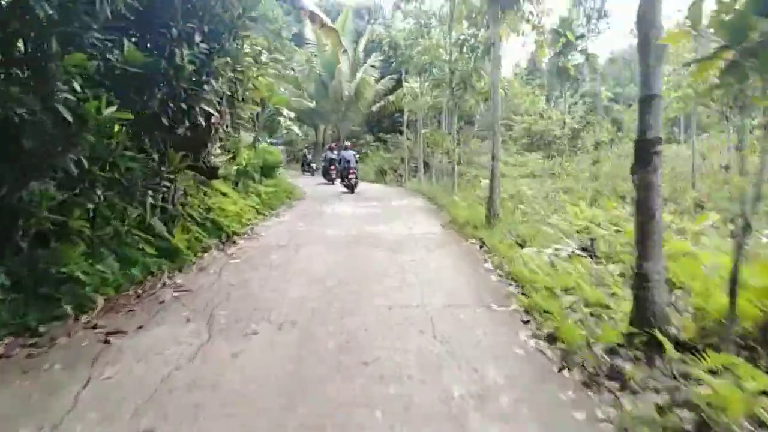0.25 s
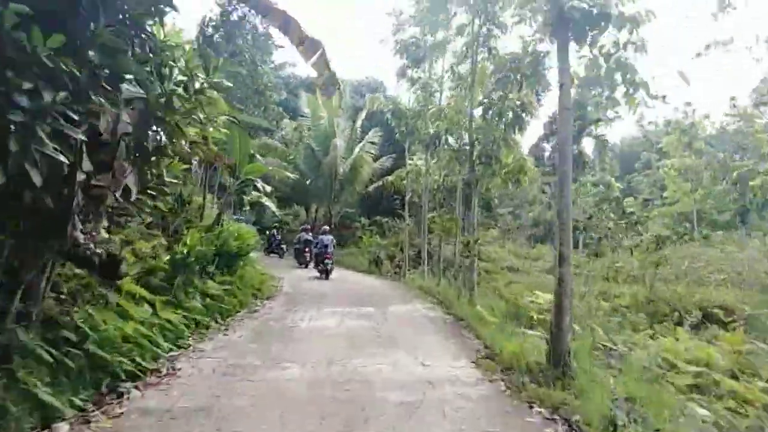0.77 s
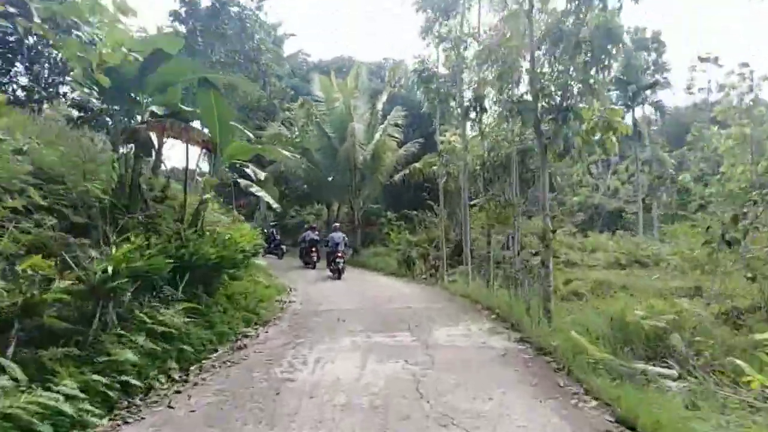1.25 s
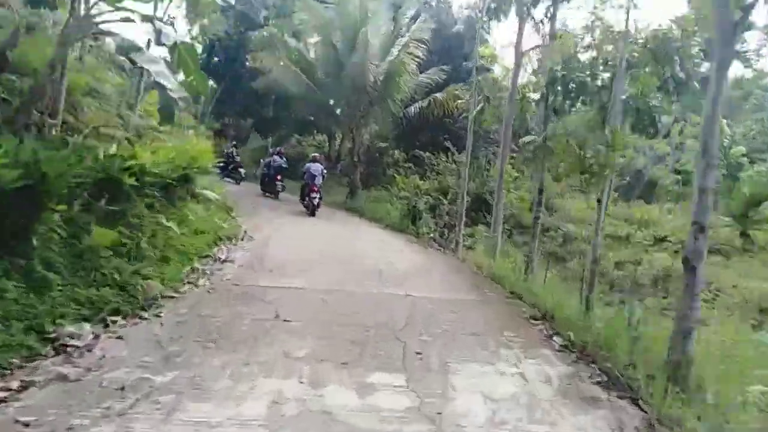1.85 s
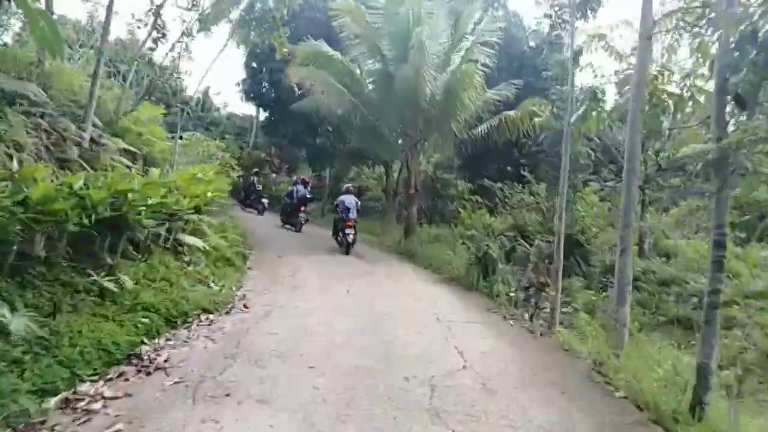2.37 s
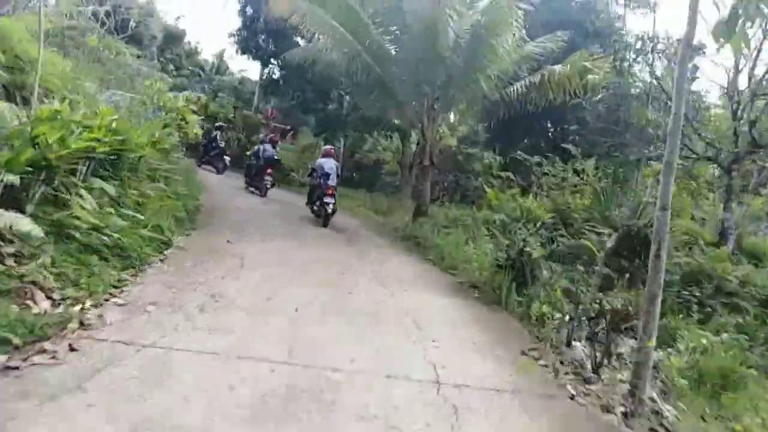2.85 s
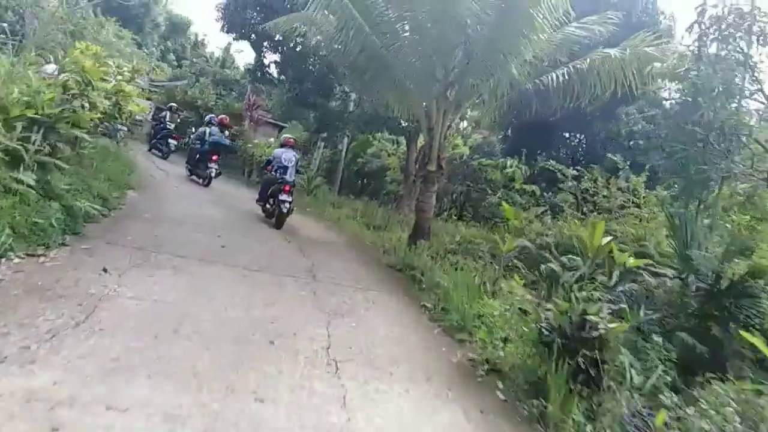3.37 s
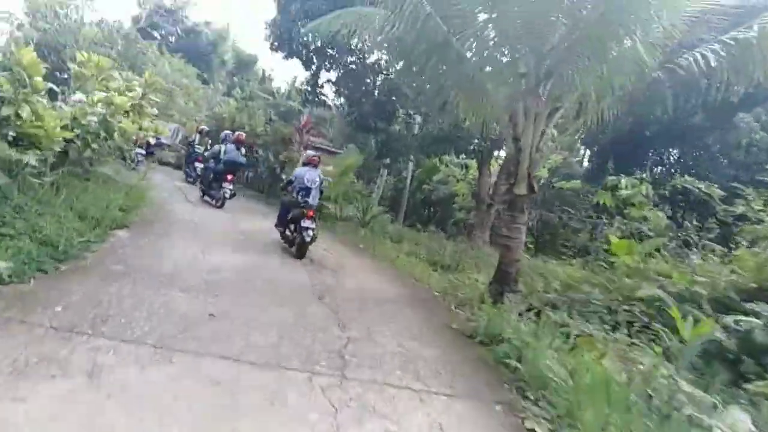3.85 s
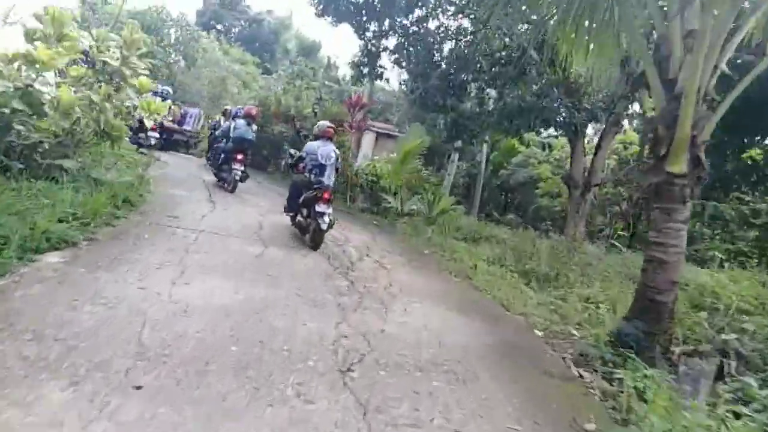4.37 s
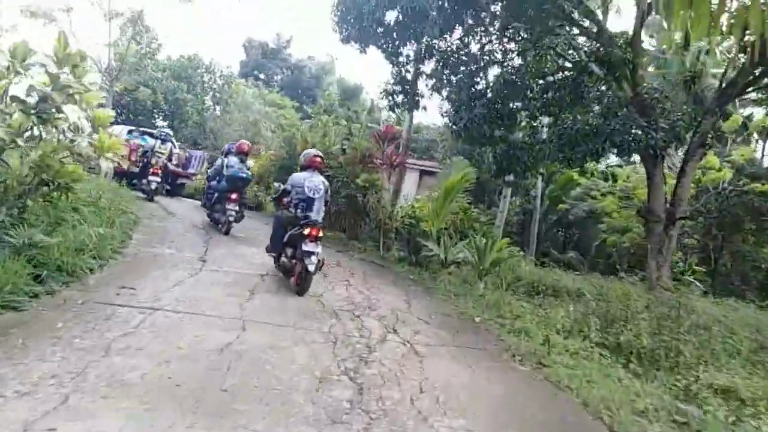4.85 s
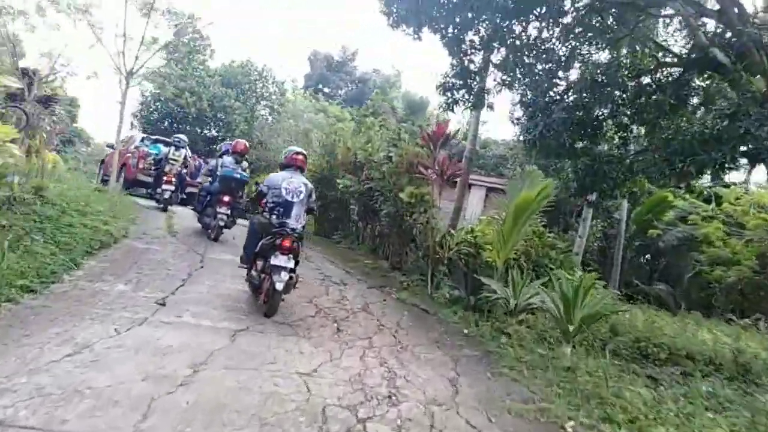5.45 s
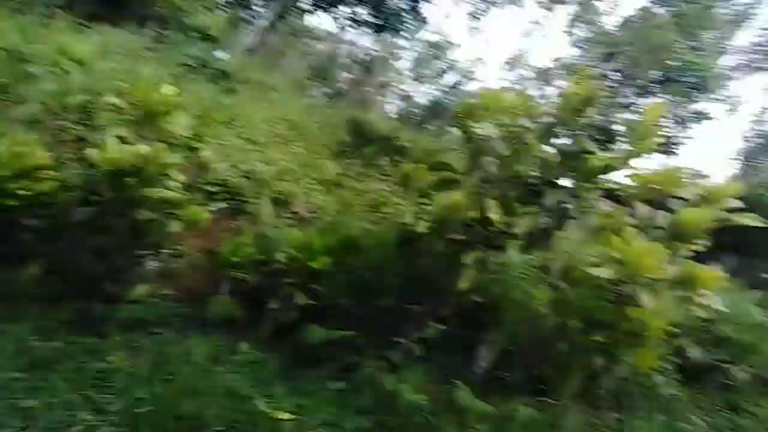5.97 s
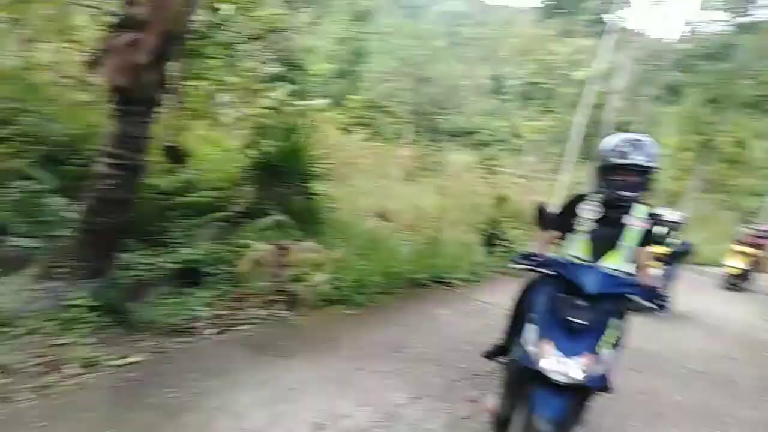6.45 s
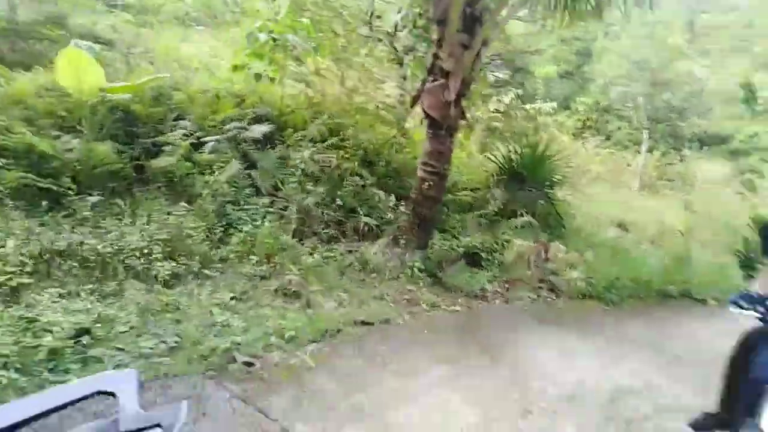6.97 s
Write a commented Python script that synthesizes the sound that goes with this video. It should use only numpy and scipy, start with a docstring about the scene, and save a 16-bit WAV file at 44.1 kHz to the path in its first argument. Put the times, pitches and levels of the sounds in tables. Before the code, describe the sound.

Recorded from a moving scooter outdoors: one small engine starts fast and raspy, then slows to a deep putter while two others throb beside it. Wind rumbles and pops, mostly on the left, over steady fan and tyre hiss. Near the end a loose panel chatters, wind drops away, and a steady engine stays strong.

```python
"""On the back of a scooter in a convoy of single-cylinder four-strokes on a concrete lane: one engine opens fast
and slows, two more fire beside it, each blow ringing its pipe, with barks of crack noise and pure tones on top.
Filtered noise makes fans and tyres hiss throughout; wind rumbles mostly at the left port, with pops from 2 to 3.7 s.
From 4.7 s a loose panel, shaken by the firings of the engines, chatters in short ringing knocks; near 5.6 s the wind
drops as the phone turns away, then the distant engine swells briefly and the steady one stays strong to the end."""
import sys
import numpy as np
from scipy import signal
from scipy.io import wavfile
from scipy.ndimage import uniform_filter1d

SR = 44100
rng = np.random.default_rng(int(sys.argv[2]) if len(sys.argv) > 2 else 0)


def wav_out(sig):
    """Save sig, one row per channel (or a flat mono array), as 16-bit PCM at SR to the path in sys.argv[1]."""
    wavfile.write(sys.argv[1], SR, np.round(np.clip(np.atleast_2d(sig).T, -1, 1) * 32767).astype(np.int16))


N = 317520  # samples: 7.2 s


def undb(db):
    """Gain of a level in dB."""
    return 10 ** (np.asarray(db) / 20)


def unit(x):
    """Scale to rms 1."""
    return x / np.sqrt(np.mean(x ** 2))


def curves(table):
    """Draw each column after the time as a line with one value a sample."""
    times, *columns = np.transpose(table)
    t = np.arange(N) / SR
    return [np.interp(t, times, column) for column in columns]


def sides(x, pan_db):
    """Left and right of a source, pan_db being left minus right."""
    return x * undb(np.multiply.outer([.5, -.5], pan_db * np.ones(N)))


def band(x, hz, width):
    """Resonance with gain 1 at its centre."""
    b, a = signal.iirpeak(hz, hz / width, SR)
    return signal.lfilter(b, a, x)


def band_twice(x, hz, width):
    """The same resonance twice over, for steeper skirts."""
    return band(band(x, hz, width), hz, width)


def ring(x, modes):
    """Sum of steep resonances, neighbours in opposite sign so that the gaps fill."""
    return sum((-1) ** k * undb(db) * band_twice(x, hz, 1.5 * width)
               for k, (hz, width, db) in enumerate(modes))


def struck(x, modes, size):
    """Modes that all start together with the blow; a larger pipe sounds lower."""
    return sum(undb(db) * band(x, hz / size, width) for hz, width, db in modes)


def walk(rate):
    """Random levels held 1 / rate s and slewed twice; spread near 1."""
    hold = int(SR / rate)
    steps = np.repeat(rng.standard_normal(N // hold + 1), hold)
    return 1.08 * uniform_filter1d(uniform_filter1d(steps, hold), hold)[:N]


def cycles(rate, start):
    """Engine cycles run so far, one firing each."""
    return start + np.cumsum(curves(rate)[0]) / SR


# Resonances of the exhaust pipe at nominal size: (frequency [Hz], width [Hz], relative level [dB])
EXHAUST_MODES = [(103.5, 17, 6), (142, 18, 16), (180.4, 28.8, 26), (210, 19, -5.5), (242.5, 15, 3.5)]
# Resonances of the silencer at nominal size: (frequency [Hz], width [Hz], relative level [dB])
SILENCER_MODES = [(332, 31, 6.5), (427, 81, 9.5), (627, 19, 0)]
# Resonances of the bark: (frequency [Hz], width [Hz], relative level [dB])
BARK_MODES = [(1190, 310, 3.5), (2180, 330, -10), (3260, 480, -5.5)]


def engine(phase, table, pan_db, pipe):
    """Nearly even firings ring pipe and silencer; a ragged crack and a puff of gas ride on each."""
    boom_db, rasp_db, bark_db = curves(table)
    at = np.flatnonzero(np.diff(np.floor(phase)))
    late, size, sharp = rng.standard_normal((400, 3))[:len(at)].T
    # firings stray by 70 microseconds, blows and cracks by 1.5 dB
    at = np.clip(at + (.00007 * SR * late).astype(int), 0, N - 1)
    blow, crack = np.zeros(N), np.zeros(N)
    blow[at] = undb(1.5 * size)
    crack[at] = undb(1.5 * sharp)

    # each crack is a click with a 3 ms tail of noise
    tail = signal.lfilter([1], [1, -np.exp(-1 / (.003 * SR))], crack)
    crack = unit(crack) + 1.1 * unit(tail * rng.standard_normal(N))
    puff = unit(np.exp(-(phase % 1) / 0.31) * rng.standard_normal(N))
    # the valve opens over about a millisecond, which dulls the blow
    valve = signal.butter(4, 620, fs=SR, output="sos")
    gas = signal.sosfilt(valve, unit(blow) + .12 * puff)

    boom = unit(struck(gas, EXHAUST_MODES, pipe))
    rasp = unit(band(struck(gas, SILENCER_MODES, pipe), 350, 330))
    bark = unit(ring(crack, BARK_MODES))
    sound = undb(boom_db) * (boom + undb(rasp_db) * rasp) + undb(bark_db) * bark
    # the road and the bank return it later, by other paths to each port
    echo = np.array([np.roll(sound, lag) for lag in rng.integers(60, 200, 2)])
    return sides(sound, pan_db) + undb(-27.0) * echo


# Loudness of each engine, the bark being its sharp crack under load:
# (time [s], boom level [dB], rasp against boom [dB], bark level [dB])
REVVING_LEVELS = [(0, -14.5, -14, -44), (.4, -14.5, -11, -33), (.6, -15, -18, -46), (.85, -22, -31, -53),
                  (1.6, -19, -29, -50), (2.15, -24, -18, -53), (2.6, -17.5, -29.5, -46),
                  (3.7, -14, -6.5, -43.5), (4.15, -25.5, -26, -64), (4.65, -15, -23, -37),
                  (5.05, -19.5, -43, -53), (5.45, -12, -17, -41), (5.9, -18, -26, -48),
                  (6.45, -20, -26, -41), (6.7, -19, -37, -28), (7.2, -21.5, -25, -44)]
STEADY_LEVELS = [(0, -35, -2, -50), (1.3, -29, -5, -48), (1.8, -22.5, -27, -53), (2.35, -24, -9, -46),
                 (2.85, -20, -3.5, -43), (3.55, -19, -26, -52), (4.1, -16, -19.5, -43),
                 (4.72, -14.5, -9.5, -34.5), (5.2, -16.5, -5.5, -34.5), (5.5, -15.5, -14, -45),
                 (5.85, -11.5, -10, -32), (6.4, -13.5, -11, -26.5), (6.6, -13, -41, -32),
                 (7.2, -12.5, -36, -43)]
DISTANT_LEVELS = [(0, -26, -9, -54), (1.7, -19.5, -20.5, -54), (2.2, -30, -16, -50), (4.6, -30, -17, -50),
                  (5, -25.5, -24, -52), (6.2, -15.5, -23, -34), (7.2, -29, -5, -52)]
# Speed of each engine: (time [s], firing rate [Hz])
REVVING_RATE = [(0.0, 50.27), (0.35, 49.42), (0.55, 47.22), (0.95, 38.81), (1.35, 35.45), (2.1, 33.57),
                (3.14, 44.19), (3.87, 47.12), (4.0, 44.07), (4.3, 31.41), (4.85, 36.67), (5.3, 34.48),
                (5.6, 36.14), (5.78, 34.86), (6.5, 32.63), (7.2, 35.55)]
STEADY_RATE = [(0.0, 35.57), (1.55, 34.37), (2.3, 32.56), (2.9, 31.98), (3.07, 32.31), (3.72, 30.85),
               (4.1, 32.41), (4.35, 30.9), (4.72, 31.72), (4.9, 33.59), (5.2, 33.65), (5.7, 32.39),
               (6.17, 33.63), (6.45, 37.91), (6.75, 35.89), (7.2, 34.86)]
DISTANT_RATE = [(0, 40.6), (1.75, 39.6), (3.1, 33), (4.9, 31), (5.55, 30.7), (6.15, 32), (7.2, 32)]
# Revving, steady and distant engine:
# (cycle position at the start [0-1], left minus right [dB], pipe size [1 = nominal])
BIKES = [(.33, -2.5, 0.859), (.11, 2.7, 1.038), (.3, -5.5, 1.083)]


def engines():
    """Three singles, each firing at its own changing speed."""
    rates = (REVVING_RATE, STEADY_RATE, DISTANT_RATE)
    levels = (REVVING_LEVELS, STEADY_LEVELS, DISTANT_LEVELS)
    return sum(engine(cycles(rate, start), table, pan_db, pipe)
               for rate, table, (start, pan_db, pipe) in zip(rates, levels, BIKES))


# Crank of the steady engine humming once a turn: (time [s], level [dB])
CRANK_HUM = [(0, -21.5), (1.5, -23.5), (2.4, -29), (4.5, -33), (5.5, -29), (6.5, -24), (7.2, -20)]
# Clear tone at six times the firing rate of the revving engine: (time [s], level [dB])
SIXTH_TONE = [(0, -30.5), (.7, -22), (1.2, -34), (2.2, -35), (2.8, -29), (3.9, -24.5), (4.2, -28),
              (4.5, -45)]


def engine_tones():
    """Pure tones locked to the speed of two engines, equal at both ports."""
    # a four-stroke turns twice for each firing
    crank = np.sin(2 * np.pi * 2 * cycles(STEADY_RATE, 0))
    sixth = np.sin(2 * np.pi * 6 * cycles(REVVING_RATE, BIKES[0][0]))
    # the root of two turns sine peaks into rms levels
    return np.sqrt(2) * (undb(curves(CRANK_HUM)[0]) * crank + undb(curves(SIXTH_TONE)[0]) * sixth)


# Knocks of the loose panel: (time [s], peak level [dB], pitch [Hz])
PANEL_KNOCKS = [(4.709, -9, 2250), (4.763, -16, 2503), (4.79, -12.5, 2300), (4.804, -15.5, 3880),
                (4.833, -16, 3140), (4.864, -15, 3570), (4.894, -10, 3840), (4.924, -12.5, 4000),
                (4.983, -6.5, 3897), (5.013, -14, 2690), (5.101, -11.5, 2540), (5.132, -5, 4100),
                (5.161, -7.5, 2680), (5.19, -8, 3600), (5.251, -14.5, 5500), (6.189, -14, 2380),
                (6.336, -13, 3050), (6.701, -15, 3450), (6.73, -10, 3340), (6.761, -17, 3240),
                (6.792, -17, 3140), (6.966, -13, 3940), (7.051, -9.5, 3720)]
CHATTER_T60_S, CHATTER_PAN_DB = .024, 2.5  # 60 dB decay of the bounces; left minus right


def chatter():
    """Each knock is a few quick bounces ringing briefly, with a bright tick."""
    length = 2000  # samples
    out, t = np.zeros((2, N + length)), np.arange(length) / SR
    for s, db, hz in PANEL_KNOCKS:
        # cubing the noise leaves sparse, spiky hits
        hits = rng.standard_normal(length) ** 3 * np.exp(-np.log(1000) * t / CHATTER_T60_S)
        tick = band(band(hits, 4900, 3400), 5700, 3900)
        knock = band_twice(hits, hz, 1400) + undb(-13) * tick
        knock = knock / np.abs(knock).max()
        gains = undb([db + CHATTER_PAN_DB / 2, db - CHATTER_PAN_DB / 2])
        first = int(s * SR)
        out[:, first:first + length] += np.outer(gains, knock)
    return out[:, :N]


# Wind before its gusts: (time [s], rumble level [dB], flutter level [dB], left minus right [dB])
WIND_LEVELS = [(0, -14, -25, 2), (.4, -18, -20, 9), (.8, -20, -22, 3.5), (1.6, -20, -27, 4),
               (2, -15, -29, 7), (2.35, -12.5, -19, 12), (2.7, -13, -23.5, 2), (3.5, -13.5, -25.5, 5.5),
               (4.3, -13, -34, 0.5), (4.8, -17, -21.5, 1), (5.15, -21, -32.5, 8), (5.35, -17.5, -28, 2),
               (5.65, -32, -28, 1), (7.2, -20.5, -22, 0)]


def wind():
    """Eddies at each port, partly shared in the bass: a lumpy rumble and a faster flutter in gusts."""
    rumble_db, flutter_db, pan_db = curves(WIND_LEVELS)
    out, shared = [], rng.standard_normal(N)
    for _ in range(2):
        lumps_db = 2.0 * walk(11)
        gusts_db = lumps_db + 4.6 * walk(30)
        rumble = band(band(0.84 * shared + rng.standard_normal(N), 89.6, 125), 128, 139)
        flutter = band(0.31 * shared + rng.standard_normal(N), 290, 188)
        flutter = band(band(flutter, 242, 500), 290, 2000)
        out.append(undb(rumble_db + lumps_db) * unit(rumble) + undb(flutter_db + gusts_db) * unit(flutter))
    return sides(np.array(out), pan_db)


# Sharp buffets, strongest on the left port: (time [s], level at the height of the swell [dB])
BUFFET_POPS = [(2.055, -23), (2.092, -19.5), (2.24, -18.5), (2.29, -20), (2.335, -21), (2.378, -17),
               (2.405, -22), (2.452, -23), (2.517, -22), (2.606, -18.5), (2.66, -24), (2.95, -18),
               (3.696, -17)]
BUFFET_HZ, BUFFET_WIDTH_HZ = 476, 570
BUFFET_S, BUFFET_PAN_DB = .005, 9.5  # time from the height to 1/e; left minus right


def buffets():
    """Short pops of eddies, brighter than the steady rumble."""
    t = np.arange(N) / SR
    swells = sum(undb(db) * np.exp(-((t - s) / BUFFET_S) ** 2) for s, db in BUFFET_POPS)
    eddies = unit(band_twice(rng.standard_normal(N), BUFFET_HZ, BUFFET_WIDTH_HZ))
    return sides(swells * eddies, BUFFET_PAN_DB)


# Fans and belts: (time [s], hiss level [dB], whine against hiss [dB], left minus right [dB])
RUNNING_LEVELS = [(0, -25.5, -17, 7), (.45, -27, -24, 5.5), (.6, -25, -30, 8.5), (2, -25.5, -24, 10),
                  (2.15, -29.5, -16, 4.5), (2.62, -28.5, -9, 4.5), (2.72, -27.5, -5, 9),
                  (3, -29.5, -6, 4.5), (3.8, -29, -10, 7), (3.95, -26.5, -17, 4), (4.7, -27.5, -14, 4),
                  (5.2, -26, -8, 2), (6, -27.5, -9, 2), (6.6, -26.5, -11, 2.5), (7.2, -24, -33, 5.5)]
# Colour of the hiss: (frequency [Hz], relative level per Hz [dB])
HISS_COLOUR = [(880, -35), (1500, 2.5), (2020, 0.5), (2450, 1.5), (3370, -1), (3760, -14.5), (5450, -2.5),
               (12100, -27.5), (13200, -29.5)]
# Resonances of the engine casing: (frequency [Hz], width [Hz], relative level [dB])
CASING_MODES = [(2235, 185, 3.5), (3327, 57, 7), (4210, 460, 4.5)]
WHINE_HZ, WHINE_WIDTH_HZ = 2388, 73


def fans():
    """Broad hiss in flickering bands, ringing in the engine casing; nearly unrelated at the two ports."""
    level_db, whine_db, pan_db = curves(RUNNING_LEVELS)
    colour_hz, colour_db = np.transpose(HISS_COLOUR)
    hiss, shake_db = 0, 0.93 * walk(12)
    for hz in 1600 * 2 ** np.arange(0, 3.1, 1 / 3):  # third octaves
        # a wider band gathers more power
        band_db = np.interp(np.log(hz), np.log(colour_hz), colour_db) + 10 * np.log10(hz)
        flicker_db = walk(10) + shake_db
        noise = band_twice(rng.standard_normal((2, N)), hz, hz / 3)
        # the hand shades one port around 4 kHz, hardly at the very top
        shade = np.exp(-np.log2(hz / 4000) ** 2 / 2.1)
        hiss = hiss + undb(band_db + flicker_db) * sides(noise, pan_db * shade)

    casing = ring(rng.standard_normal((2, N)) * undb(2.9 * walk(25)), CASING_MODES)
    # noise common to both ports plus noise of their own
    whine_noise = rng.standard_normal(N) + rng.standard_normal((2, N))
    whine = ring(whine_noise, [(WHINE_HZ, WHINE_WIDTH_HZ, 0)])
    rings = undb(-8.5) * unit(casing) + undb(whine_db) * unit(whine)
    return undb(level_db) * (unit(hiss) + sides(rings, pan_db))


# Burr of tyres and road near 1 kHz, before its flicker: (time [s], level [dB])
TYRE_BURR = [(0, -44), (.3, -26.5), (.6, -33), (1.9, -32.5), (2.25, -42), (3.9, -36.5), (4.1, -34.5),
             (5.6, -35.5)]


def tyres():
    """Rolling tyres as a flickering band of noise, partly shared by the ports."""
    noise = 0.82 * rng.standard_normal(N) + rng.standard_normal((2, N))
    burr = unit(ring(noise, [(1087, 360, 0)]))
    return undb(curves(TYRE_BURR)[0] + 2.66 * walk(12)) * burr


def scene():
    """Three engines and their tones, the panel, the wind and its buffets, fans and tyres."""
    return engines() + engine_tones() + chatter() + wind() + buffets() + fans() + tyres()


def record(dry):
    """The microphones drop the deepest bass, peaks are rounded at full scale, the top is cut."""
    x = signal.sosfilt(signal.butter(3, 52, "high", fs=SR, output="sos"), dry)
    x = x / (1 + x ** 4) ** (1 / 4)
    top_hz = 13150
    return signal.sosfilt(signal.ellip(10, .2, 70, top_hz, fs=SR, output="sos"), x)


dry = scene()
out = record(dry)
wav_out(out)
```